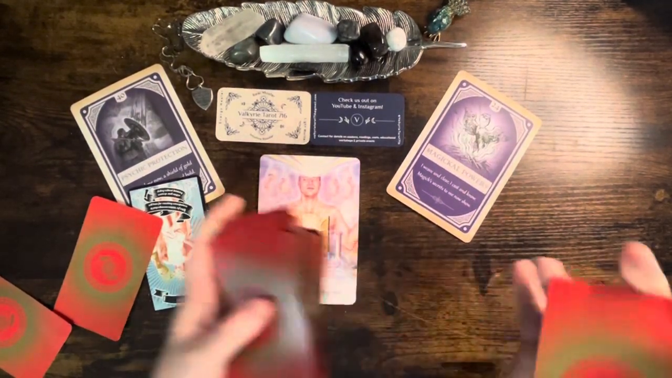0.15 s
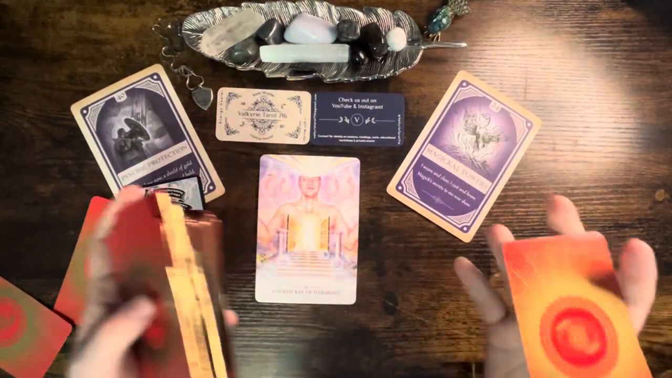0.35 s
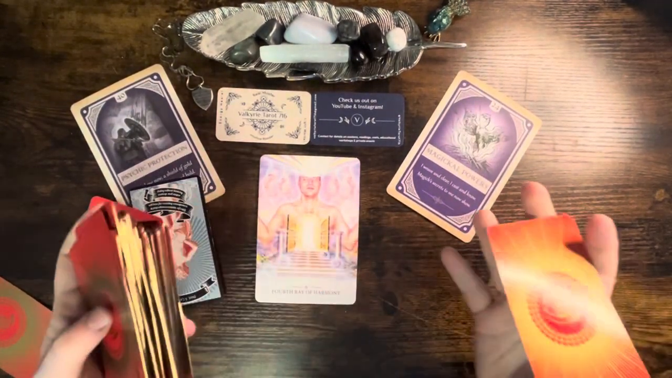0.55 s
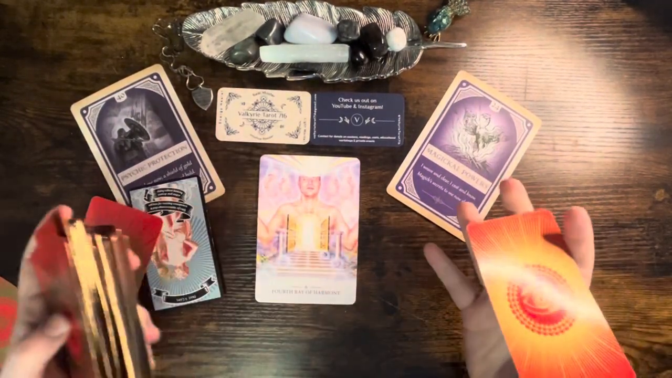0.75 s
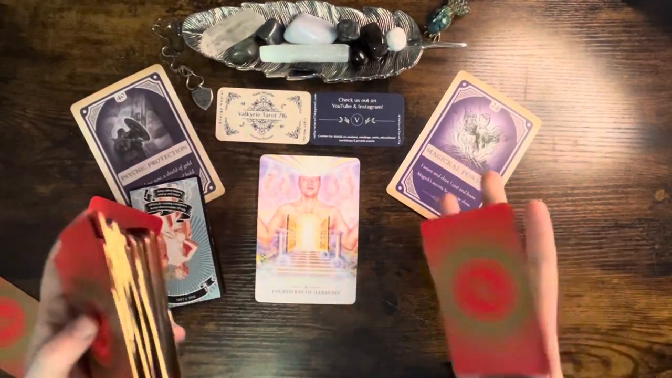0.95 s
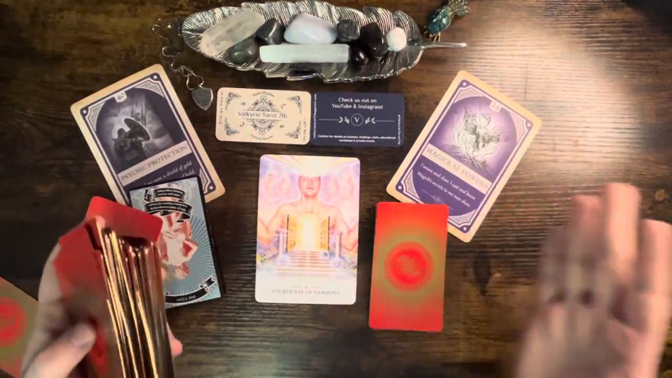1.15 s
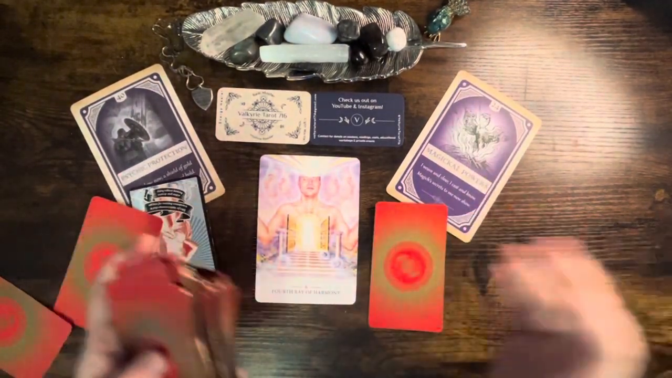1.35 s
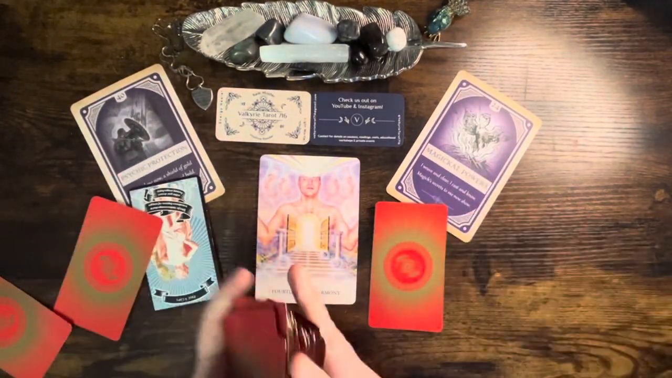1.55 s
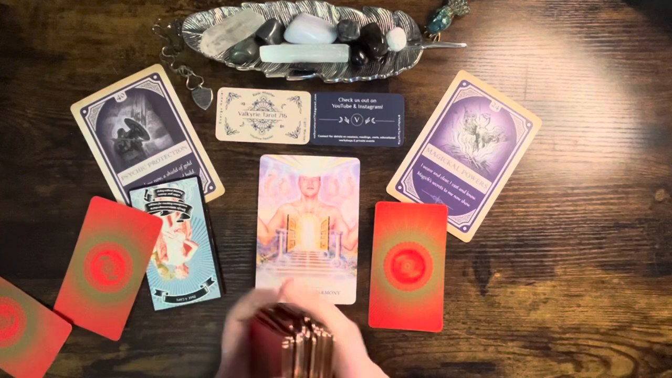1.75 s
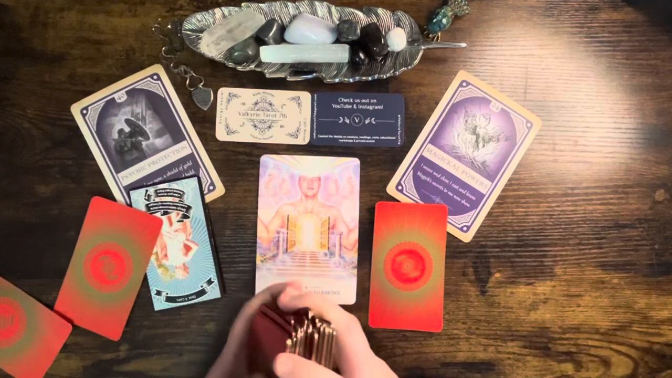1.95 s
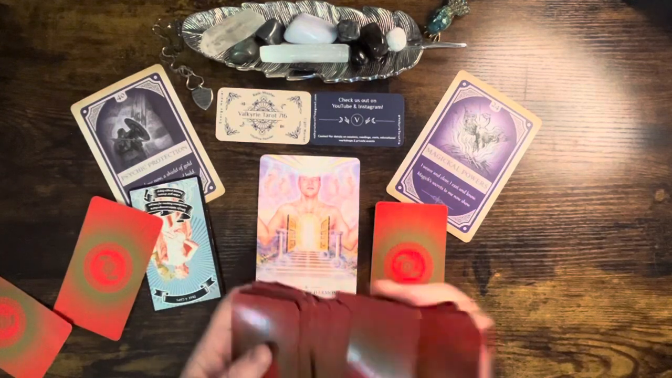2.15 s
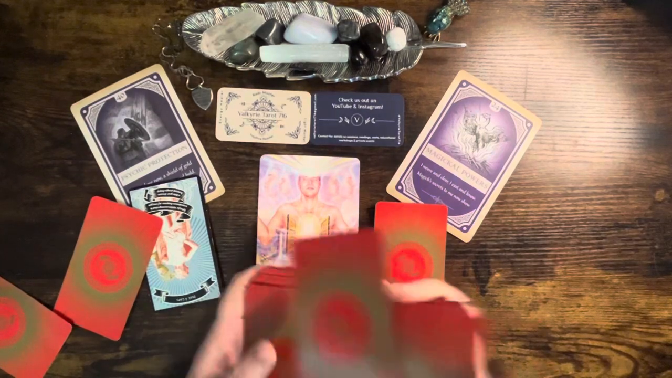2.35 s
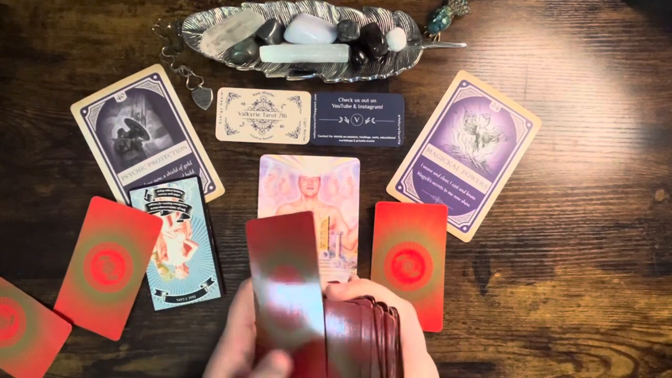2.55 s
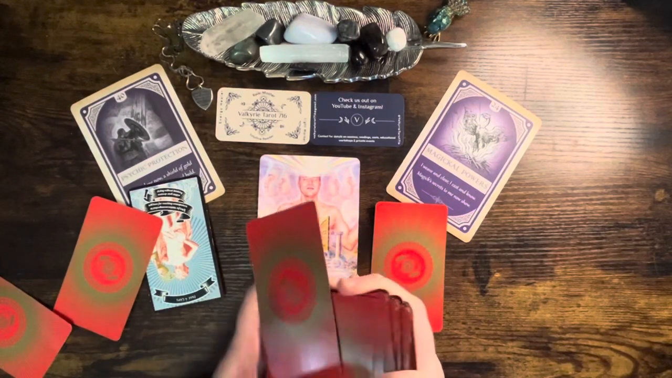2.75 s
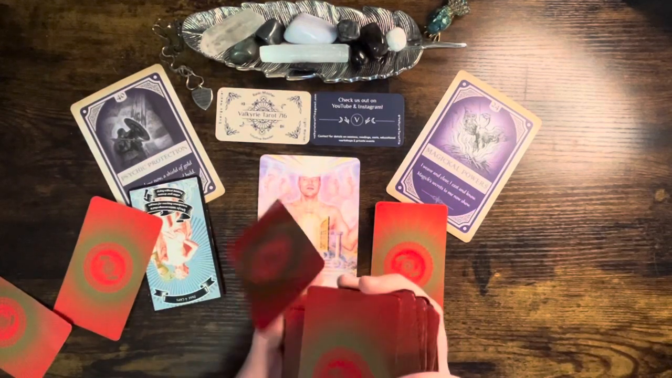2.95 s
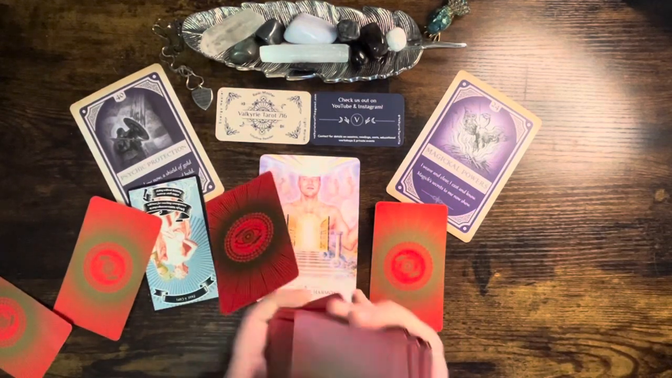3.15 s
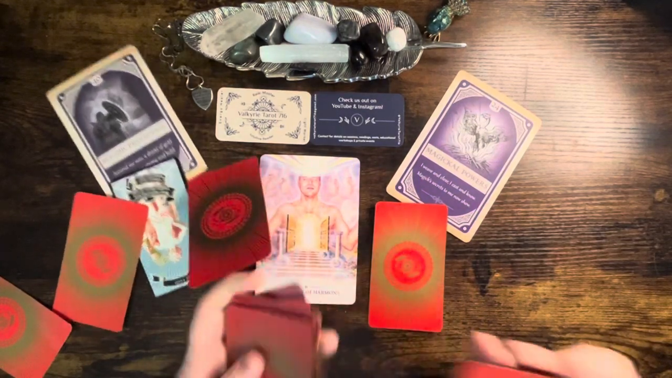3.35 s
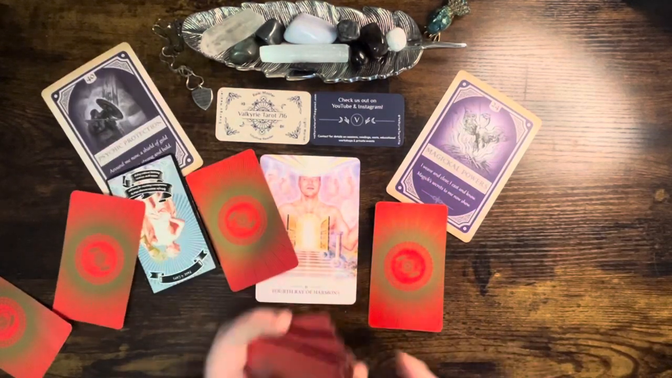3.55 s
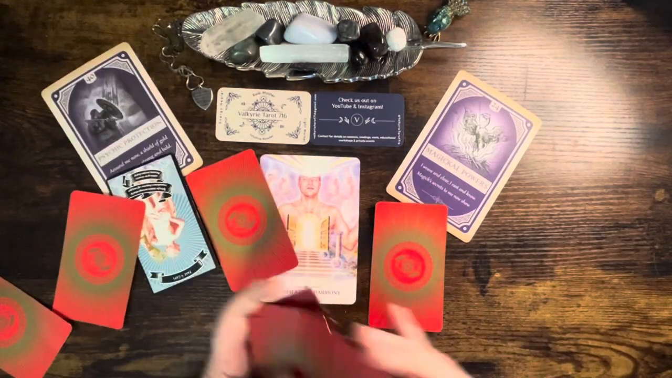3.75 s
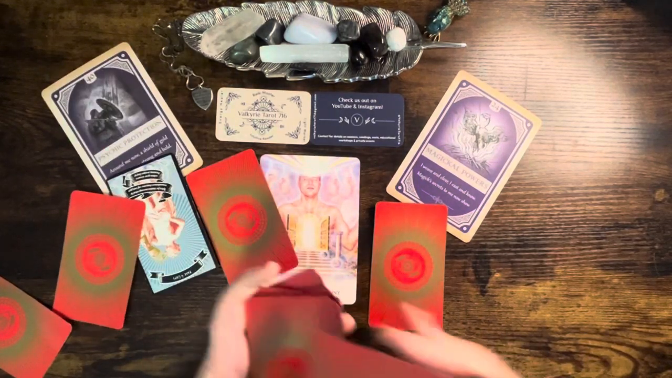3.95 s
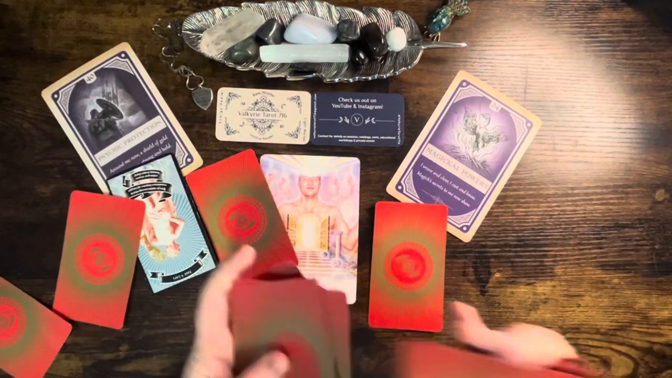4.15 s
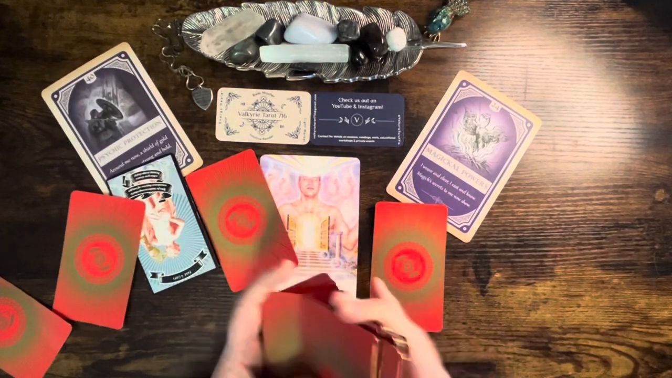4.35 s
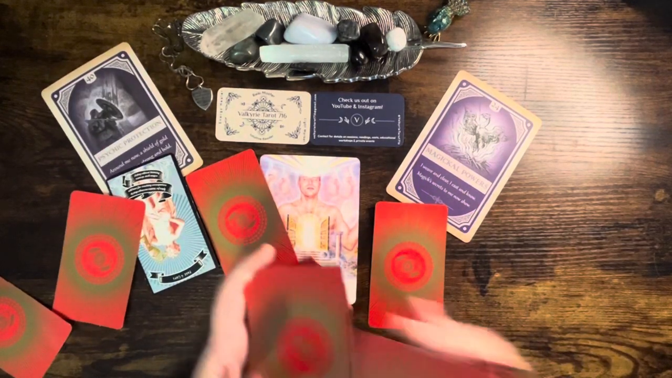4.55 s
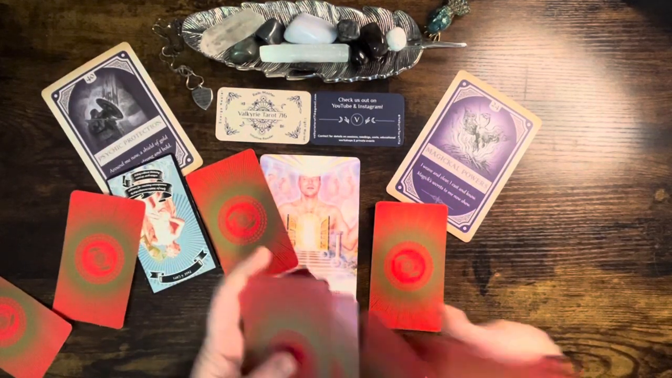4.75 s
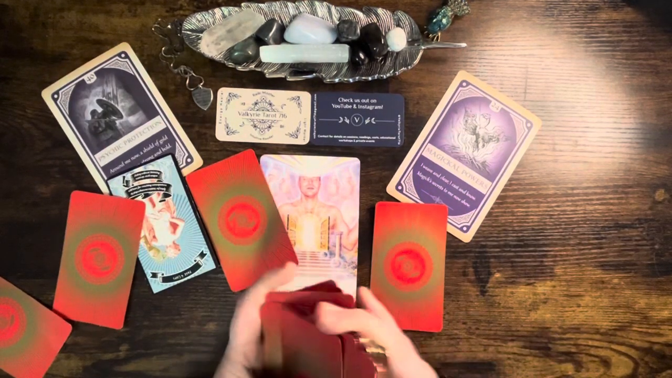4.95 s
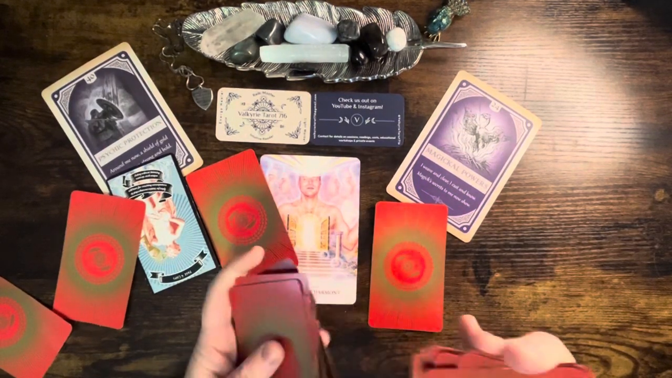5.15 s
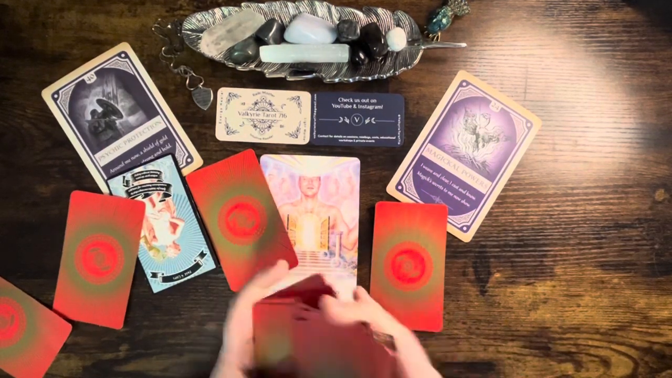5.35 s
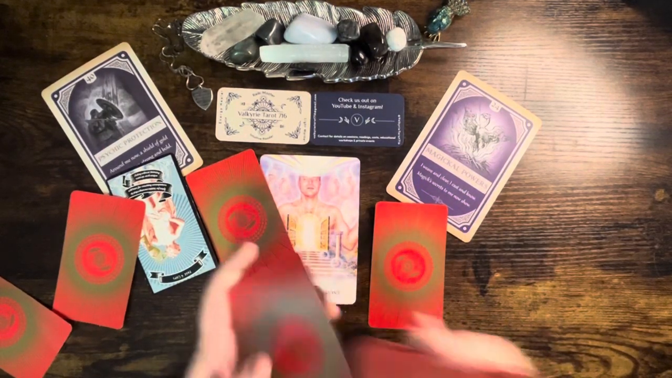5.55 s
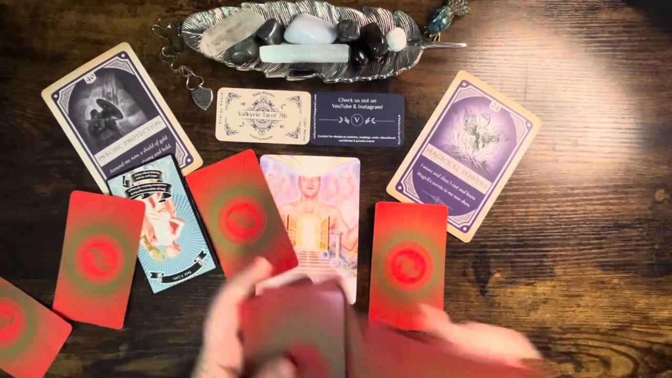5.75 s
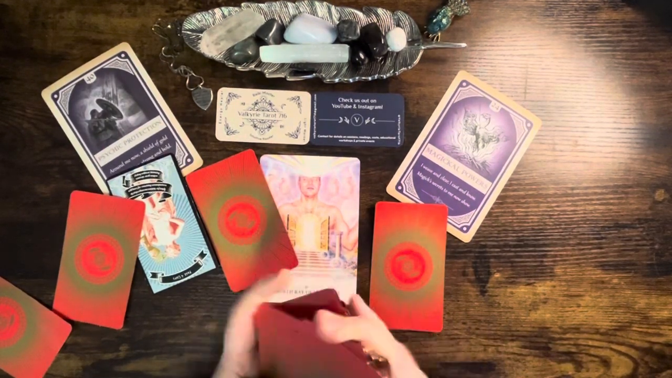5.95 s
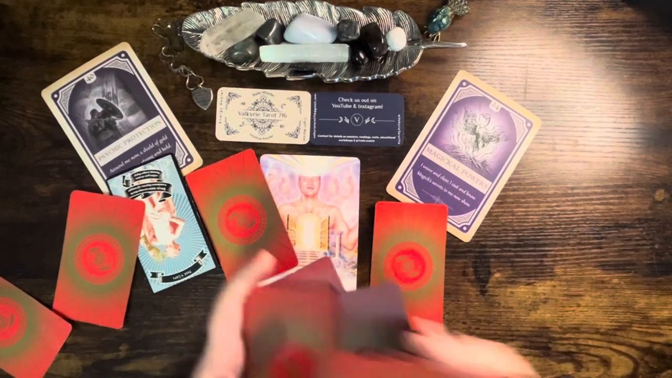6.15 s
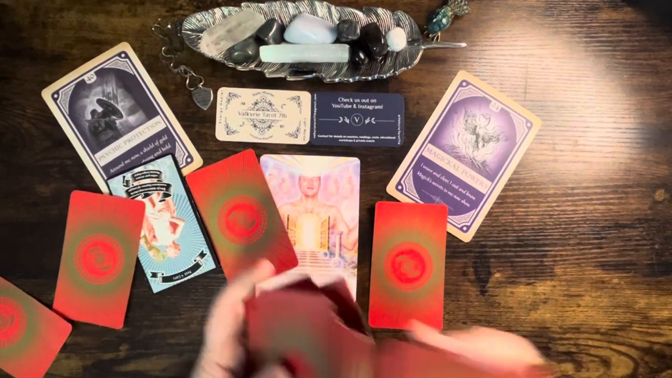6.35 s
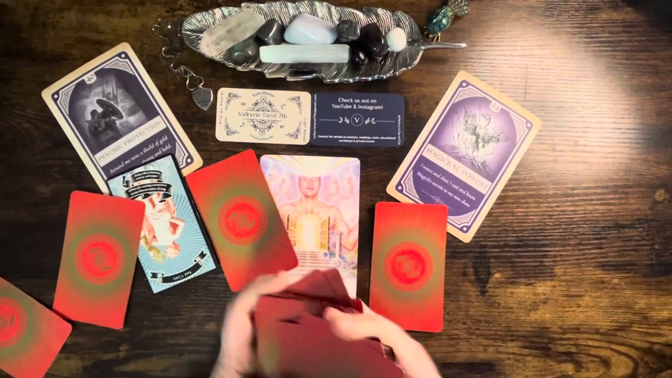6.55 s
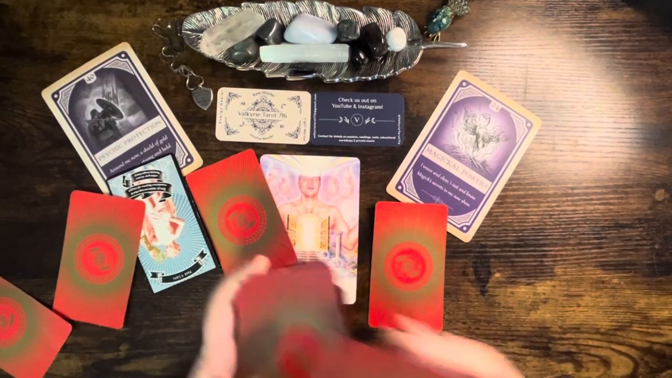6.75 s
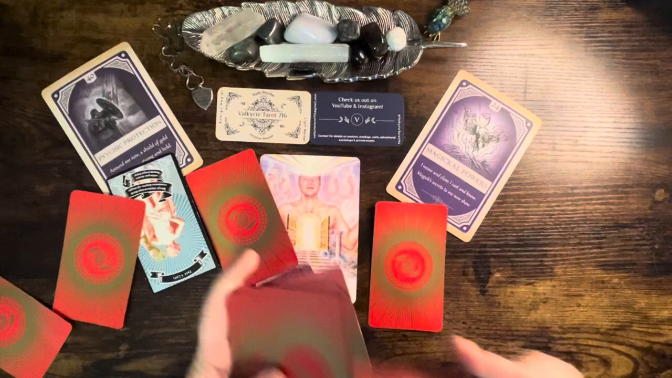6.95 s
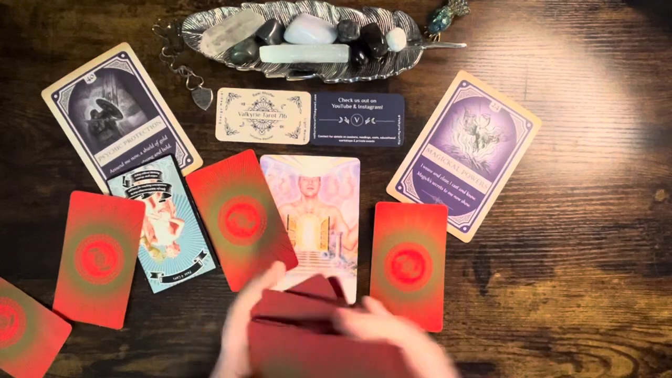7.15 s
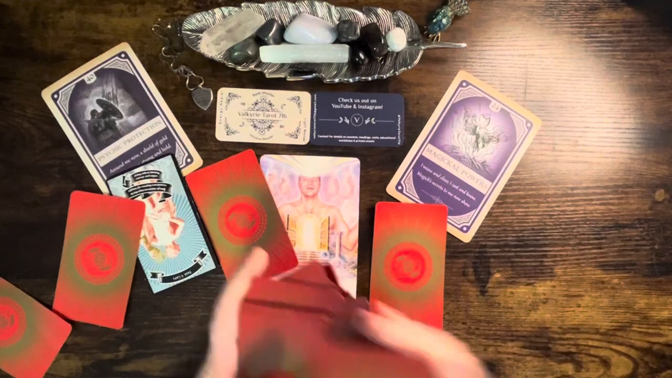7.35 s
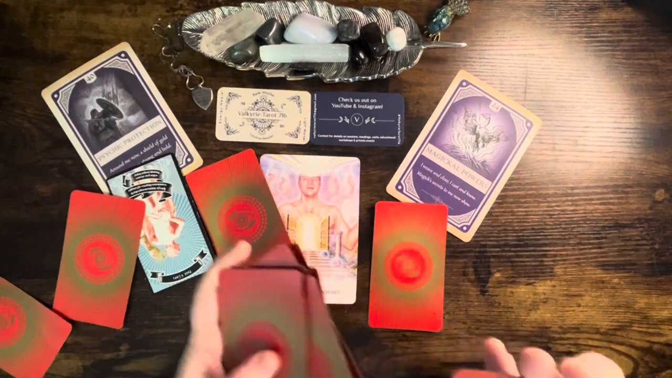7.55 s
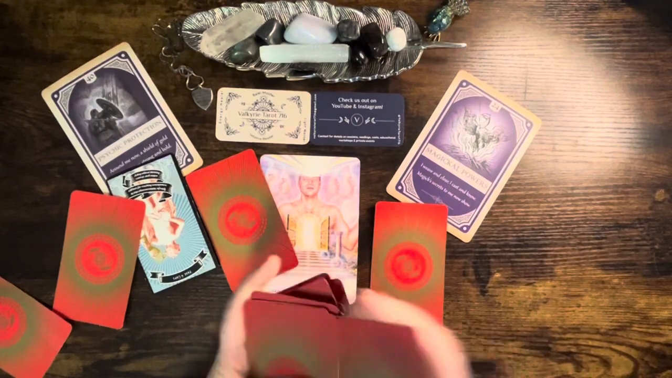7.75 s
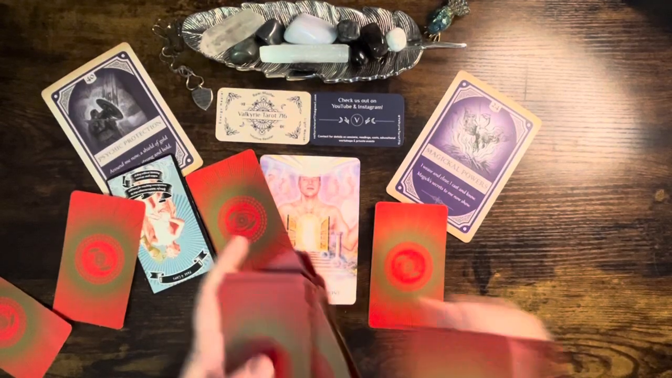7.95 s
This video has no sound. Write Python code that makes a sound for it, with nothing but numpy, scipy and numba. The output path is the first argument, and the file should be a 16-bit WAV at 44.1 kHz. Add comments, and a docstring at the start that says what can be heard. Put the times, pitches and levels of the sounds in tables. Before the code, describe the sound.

Very close stereo microphones catch stiff cards handled above a wooden table. A faint drag leads to one card slapping down with a brief bright skid. The deck is squared and cut with soft swishes and small clacks, another card slips out, then overhand shuffling begins, about three swish-and-clap strokes a second. A small furnished room adds a short tail, low ventilation rumble and faint hiss.

```python
"""A deck of stiff cards is shuffled overhand above a wooden table, close to a phone's two microphone ports.
One card is dropped on the table and another falls out; then packets slide off about three times a second:
the thumb flicks and scrapes an edge (noise bursts), the packet swishes (dense micro-slips) and claps as it
lands (short rings and noise). Softer rubs, squeaks and knocks join in. A quiet furnished room surrounds
the hands, with a low ventilation rumble and faint wide hiss made of filtered noise."""
import sys
import numpy as np
from scipy import signal
from scipy.fft import rfft, irfft, next_fast_len
from scipy.io import wavfile
from scipy.ndimage import uniform_filter1d, map_coordinates
from numba import njit

SR = 44100
rng = np.random.default_rng(int(sys.argv[2]) if len(sys.argv) > 2 else 0)


def file_out(sig):
    """Save sig as 16-bit WAV at sys.argv[1]."""
    # one column per channel
    cols = np.atleast_2d(sig).T
    # limit, then scale
    lim = np.clip(cols, -1, 1)
    pcm = np.round(lim * 32767).astype(np.int16)
    wavfile.write(sys.argv[1], SR, pcm)


N = 353682
LEFT_RIGHT = np.array([[1], [-1]])  # side sound has opposite signs at the two ports


def amp(db):
    """Decibels to gain."""
    return 10 ** (np.asarray(db) / 20)


def unit(x):
    """Scale to rms 1."""
    return x / np.sqrt(np.mean(x ** 2))


def burst(x):
    """Scale to energy 1."""
    return x / np.sqrt(np.sum(x ** 2))


def along(points, hz):
    """Read (Hz, value) points on a log-frequency axis."""
    f, value = np.transpose(points)
    return np.interp(np.log(hz + 1), np.log(f + 1), value)


def colour(x, points, size=2048):
    """Causal filter with the given spectrum, built from its cepstrum."""
    hz = np.arange(size // 2 + 1) * SR / size
    cepstrum = irfft(np.log(amp(along(points, hz))))
    # folding the cepstrum makes the filter minimum-phase
    cepstrum[1:size // 2] *= 2
    cepstrum[size // 2 + 1:] = 0
    response = irfft(np.exp(rfft(cepstrum)))
    return signal.fftconvolve(x, response)[:len(x)]


@njit
def resonate(x, hz, q):
    """State-variable band-pass with a moving centre, gain 1 there."""
    y, band, low = np.empty(len(x)), 0., 0.
    for i in range(len(x)):
        g = np.tan(np.pi * hz[i] / SR)
        v = (band + g * (x[i] - low)) / (1 + g * (g + 1 / q))
        band, low, y[i] = 2 * v - band, low + 2 * g * v, v / q
    return y


def walk(rate):
    """Smooth random sway of rms 1 that changes about rate times a second."""
    k = max(int(SR / rate), 1)
    steps = np.repeat(rng.standard_normal(N // k + 1), k)
    return unit(uniform_filter1d(steps, k)[:N])


def slips(rate, spread_db, count=N):
    """Tiny catches of a rubbing surface, rate a second, of uneven size."""
    happens = rng.random(count) < rate / SR
    return happens * rng.standard_normal(count) * amp(spread_db * rng.standard_normal(count))


def ping(hz, q, size=1024):
    """A short ring that swells and dies within a few cycles; energy 1."""
    t = np.arange(size) / SR
    return burst(t * np.exp(-np.pi * hz * t / q) * np.sin(2 * np.pi * hz * t))


def even_out(response, order=61):
    """Give each channel of an impulse response the same energy in every broad band; its fine ripple stays."""
    spectrum = rfft(response)
    power = uniform_filter1d(np.abs(spectrum) ** 2, order, axis=1)
    hz = np.linspace(0, SR / 2, power.shape[1])
    flattened = []
    for channel, band_power in zip(response, power):
        correction = np.column_stack([hz, -10 * np.log10(band_power)])
        flattened.append(colour(channel, correction))
    return np.array(flattened)


# spectrum of the ventilation rumble at the ports: pitch_hz, level_db_per_hz
RUMBLE_SPECTRUM = [(20, -91.5), (38, -90), (52, -73.5), (76, -73), (102, -74), (128, -69.5), (150, -73.5),
                   (178, -87), (203, -83.5), (250, -103), (380, -101), (800, -125)]
# spectra of the room's faint hiss, shared by the ports and opposed between them: pitch_hz, level_db_per_hz
AIR_SPECTRUM = [(150, -108), (350, -108.5), (600, -101.5), (850, -103.5), (1200, -111), (2000, -114),
                (4200, -116), (8000, -119), (13000, -122), (16000, -130)]
AIR_SIDE_SPECTRUM = [(200, -110), (380, -107), (650, -102), (1000, -106), (2000, -116), (4200, -118),
                     (8000, -127), (13000, -138)]


def background(rumble_side_db=-17, throb_db=0.9):
    """Low ventilation rumble with a slight throb, nearly alike at both ports, under a faint wide hiss."""
    noise = rng.standard_normal((4, N)) * np.sqrt(SR / 2)
    shared = colour(noise[0], RUMBLE_SPECTRUM, size=16384)
    side = amp(rumble_side_db) * colour(noise[1], RUMBLE_SPECTRUM, size=16384)
    rumble = shared + LEFT_RIGHT * side
    air = colour(noise[2], AIR_SPECTRUM) + LEFT_RIGHT * colour(noise[3], AIR_SIDE_SPECTRUM)
    return rumble * amp(throb_db * walk(rate=8.3)) + air


# colour of the furnished room's tail, shared, then further colour of its side part: pitch_hz, level_db
TAIL_SPECTRUM = [(100, 14), (300, 8.5), (600, 7), (1000, 1.5), (1700, -1.5), (4000, -1.5), (8000, -3),
                 (15000, -10)]
TAIL_SIDE_SPECTRUM = [(100, -15), (400, -1), (1500, -3.5), (3500, 0), (6000, -11), (9000, -3), (13000, -34)]
# colour of the side part of the scatter off hands and table top: pitch_hz, level_db
SCATTER_SIDE_SPECTRUM = [(200, -11.5), (800, 4.5), (1600, 3.5), (3000, -5), (4700, -13), (6500, -4.5),
                         (9000, -4.5), (13000, -22)]


def room(x, table_db=-8, table_t60=0.032, tail_db=-12, low_t60=0.22, high_t60=0.27, size=16384):
    """Direct sound, quick scatter from hands and table top, and the short tail of a furnished room."""
    t = np.arange(size) / SR
    scatter_decay = (t > .0006) * amp(-60 * t / table_t60)
    near = [burst(rng.standard_normal(size) * scatter_decay) for _ in range(2)]
    low_pass = signal.butter(2, 1800, fs=SR, output="sos")
    high_pass = signal.butter(2, 1800, "high", fs=SR, output="sos")
    tails = []
    for _ in range(2):
        noise = rng.standard_normal(size) * np.clip(t / 0.004, 0, 1) ** 2
        lows = signal.sosfilt(low_pass, noise) * amp(-60 * t / low_t60)
        highs = signal.sosfilt(high_pass, noise) * amp(-60 * t / high_t60)
        tails.append(colour(burst(lows - highs), TAIL_SPECTRUM))
    mid = (t == 0) + amp(table_db) * near[0] + amp(tail_db) * tails[0]
    scatter_side = amp(table_db) * colour(near[1], SCATTER_SIDE_SPECTRUM)
    side = scatter_side + amp(tail_db) * colour(tails[1], TAIL_SIDE_SPECTRUM)
    response = even_out(mid + LEFT_RIGHT * side)
    return signal.fftconvolve(x[None], response, axes=1)[:, :N]


def table_mirror(x, mirror_db=-7, lag_s=0.000904, sway_db=2.5):
    """The table top returns the rubbing late; the lag sways with the hands, so bands wander through the hiss."""
    lag = lag_s * SR * amp(sway_db * walk(rate=3))
    late = map_coordinates(x, [np.arange(N) - lag], order=3, mode="constant")
    return (x + amp(mirror_db) * late) / np.hypot(1, amp(mirror_db))


def off_hands(x, lag_s=0.00111, sway_db=2.5, glance_db=-2):
    """Each impact also glances off the moving hands, so its path to the ports keeps changing."""
    lag = lag_s * SR * amp(sway_db * walk(rate=4))
    return amp(glance_db) * map_coordinates(x, [np.arange(N) - lag], order=1, mode="constant")


# the palm brushes the cards: start_s, length_s, level_db
PALM_BRUSHES = [(0.406, .14, -51), (1.1, 0.56, -62.5)]
# shape of the palm's dull spectrum: pitch_hz, relative_level_db
PALM_SPECTRUM = [(60, 4), (120, 2.5), (200, -1), (380, -3), (550, -11), (1200, -27), (3000, -53)]


def palm():
    """Skin dragging over a card: a dull rub that swells and fades."""
    t = np.arange(N) / SR
    swell = np.zeros(N)
    for start_s, length_s, level_db in PALM_BRUSHES:
        part = np.clip((t - start_s) / length_s, 0, 1)
        swell += amp(level_db) * np.sin(np.pi * part)
    return swell * unit(colour(slips(rate=3300, spread_db=3.0), PALM_SPECTRUM))


# soft squeaks of card on card or on the table:
# start_s, length_s, start_pitch_hz, end_pitch_hz, level_db, resonance_q (of each of two passes)
CARD_SQUEAKS = [(0.5, 1.24, 510, 530, -60, 3.2), (1.139, 0.078, 486, 554, -49, 6),
                (1.219, 0.22, 530, 570, -63, 4), (1.46, .16, 527, 520, -58, 3.5),
                (3.791, 0.051, 4450, 4330, -41, 6), (3.843, 0.053, 4300, 4220, -56, 6),
                (4.101, 0.025, 1460, 1660, -28.5, 6), (4.386, 0.05, 1550, 2540, -40, 2.7)]


def squeaks(waver_db=0.4):
    """Soft rubbing in one narrow, gliding resonance that swells and fades while its pitch wavers."""
    out, waver = np.zeros(N), amp(waver_db * walk(rate=60))
    noise = rng.standard_normal(N)
    for start_s, length_s, start_hz, end_hz, level_db, q in CARD_SQUEAKS:
        part = np.linspace(0, 1, int(length_s * SR))
        start = int(start_s * SR)
        span = slice(start, start + len(part))
        hz = (start_hz + (end_hz - start_hz) * part) * waver[span]
        once = resonate(noise[span], hz, float(q))
        rub = resonate(once, hz, float(q))
        out[span] += amp(level_db) * np.sin(np.pi * part) * unit(rub)
    return out


# one card drags lightly over the fingers while it is drawn and held out:
# time_s, level_db, pitch_hz (resonance of the gap under it)
DRAG_PATH = [(0, -67, 1660), (0.2, -73.5, 1600), (0.5, -66.5, 1510), (0.75, -73.5, 1500), (1.0, -70, 1450),
             (1.35, -72, 1400), (1.58, -59.5, 1340), (1.75, -79, 1350), (1.9, -100, 1330)]
# levels of the gap's rings at 1, 2, 3... times its resonance: relative_level_db
DRAG_RINGS = [9, 1.5, -1, -8.5, -15.5]


def drag(first_q=5, waver_db=2.0):
    """Light, wavering friction rings the gap under a single card; its resonances sink as the card tilts away."""
    t = np.arange(N) / SR
    time_s, level_db, pitch_hz = np.transpose(DRAG_PATH)
    gap_hz = np.interp(t, time_s, pitch_hz) * amp(0.29 * walk(rate=12))
    rub = slips(rate=7000, spread_db=5.0)
    rings = np.zeros(N)
    for k, ring_db in enumerate(DRAG_RINGS, 1):
        rings += amp(ring_db) * unit(resonate(rub, k * gap_hz, float(first_q * k)))
    return unit(rings) * amp(np.interp(t, time_s, level_db) + waver_db * walk(rate=28))


# shape of the dropped card's hiss on the wood: pitch_hz, relative_level_db
SKID_SPECTRUM = [(300, -15), (600, 6), (1050, -13), (1400, 4), (2300, -15), (3000, -9), (3450, 6),
                 (4100, -3), (4680, 8), (5400, -2), (6300, 5.5), (7000, -11), (7900, 4.5), (9000, -11.5),
                 (12000, -4.5), (15000, -9)]


def skid(start_s=1.18, stop_s=1.386, edge_s=0.052, end_db=-44, growth_db=15, grain_db=1):
    """Fine wood grain passes under the sliding card: an even, bright hiss that swells and is cut short."""
    t = np.arange(N) / SR
    part = np.clip((t - start_s) / (stop_s - start_s), 0, 1)
    # fades of edge_s lie just outside start and stop
    moving = np.clip(np.minimum(t - start_s, stop_s - t) / edge_s + 1, 0, 1)
    grain = slips(rate=17000, spread_db=-1.5) * amp(grain_db * walk(rate=190))
    return unit(colour(grain, SKID_SPECTRUM)) * moving * amp(end_db - growth_db * (1 - part) ** 2)


# shape of the clap of trapped air, also used for corner snaps and knocks: pitch_hz, relative_level_db
CLAP_SPECTRUM = [(200, -29.5), (450, -7.5), (700, 7), (1600, 5), (3300, 4), (5000, 3), (9000, -19)]
# single corners springing free, and the falling card's flutter: start_s, level_db, pitch_hz
CORNER_SNAPS = [(.942, -30, 695), (0.985, -36, 2320), (1.131, -23, 900), (1.579, -28, 800),
                (2.072, -36, 2400), (2.199, -23.5, 2200), (2.651, -47, 2000), (2.9694, -30, 4200),
                (3, -27, 2930), (3.0233, -27.5, 3950), (3.026, -34, 2900), (3.038, -37, 3820),
                (3.089, -28, 4520), (3.718, -30, 2000), (3.7612, -15, 1710), (3.7735, -20, 3300),
                (3.796, -17, 2000), (4.344, -22.5, 2720), (4.388, -24, 1660), (4.678, -21.5, 3400),
                (4.895, -11.5, 1800), (4.991, -19, 2200), (5.3833, -22, 2800), (5.451, -15, 2500),
                (5.567, -33, 1300), (5.704, -10, 3000), (6.2298, -19, 1100), (6.494, -18, 1510),
                (6.564, -20, 1560), (6.582, -23, 3800), (6.629, -14, 2400), (6.876, -27, 3500),
                (6.908, -8.5, 3680), (7.11, -28, 3000), (7.163, -27, 1700), (7.428, -17, 2600),
                (7.446, -30, 2300), (7.719, -30, 2300)]


def corners(corner_q=4, snap_db=-5, snap_s=0.0019, spread_db=9, size=1024):
    """A corner lets go with a tiny dry snap of uneven touches and a short ring."""
    out, t = np.zeros(N + size), np.arange(size) / SR
    for start_s, level_db, pitch_hz in CORNER_SNAPS:
        touches = slips(rate=10000, spread_db=spread_db, count=size) * np.exp(-t / snap_s)
        snap = burst(colour(touches, CLAP_SPECTRUM))
        start = int(start_s * SR)
        out[start:start + size] += amp(level_db) * burst(ping(pitch_hz, corner_q) + amp(snap_db) * snap)
    return out[:N]


# the deck knocked firmly, or a card hitting the table flat:
# start_s, level_db, pitch_factor, soft_hz (above it the contact is too soft to ring the cards fully)
DECK_KNOCKS = [(1.0815, -7, 1.06, 6000), (5.0325, 9, 1.014, 3010), (6.504, -8.5, 1.05, 2820),
               (7.362, 2.5, 0.98, 6020)]
# what the stiff cards ring with: pitch_hz (before pitch_factor), relative_level_db, t60_s
STIFF_CARD_MODES = [(870, 2.5, 0.018), (1376, -5, 0.0077), (1740, -4.5, 0.0079), (2310, 2, 0.0092),
                    (2800, -8, .007), (3400, -0.5, 0.009), (4490, 0, 0.0063)]


def knocks(rise_s=0.0011, crack_db=-3, crack_s=0.0047, size=4096):
    """One firm contact clatters through the stack and rings its damped modes; softer ones weaken the high modes."""
    out, t = np.zeros(N + size), np.arange(size) / SR
    rise = 1 - np.exp(-t / rise_s)
    for start_s, level_db, pitch, soft_hz in DECK_KNOCKS:
        ring = np.zeros(size)
        for hz, mode_db, t60_s in STIFF_CARD_MODES:
            mode = burst(np.sin(2 * np.pi * hz * pitch * t) * amp(-60 * t / t60_s))
            ring += mode * amp(mode_db) / np.hypot(1, (hz / soft_hz) ** 2)
        touches = slips(rate=9000, spread_db=1.0, count=size) * np.exp(-t / crack_s)
        crack = colour(touches, CLAP_SPECTRUM)
        knock = burst(burst(ring * rise) + amp(crack_db) * burst(crack * rise))
        start = int(start_s * SR)
        out[start:start + size] += amp(level_db) * knock
    return out[:N]


# the thumb catches the next packet, whose edge flicks and scrapes:
# start_s, flick_level_db, scrape_level_db (before the hiss mix), scrape_length_s
THUMB_GRIPS = [(3.669, -33.5, -51.5, 0.11), (4.025, -45, -40, 0.039), (4.319, -23, -42, 0.041),
               (4.632, -34, -46, 0.014), (5.289, -18.5, -44, 0.037), (5.56, -33, -62, 0.033),
               (5.614, -18, -41.5, 0.026), (5.896, -34, -41, 0.037), (6.162, -9.5, -43, 0.0075),
               (6.49, -38, -39.5, 0.026), (6.786, -13, -42, 0.059), (7.07, -16, -39.5, 0.053),
               (7.68, -23, -43.5, 0.049), (8.005, -13.5, -46.5, 0.013)]
# shape of touching card edges: pitch_hz, relative_level_db
TICK_SPECTRUM = [(1500, -11.5), (3500, -24), (5000, 13.5), (8500, 7.5), (12500, 6), (16000, 4.5)]


def flicks(peak_s=0.0041, size=2048):
    """A released edge buzzes up and dies away within some ms."""
    out, t = np.zeros(N + size), np.arange(size) / SR
    for start_s, level_db, _, _ in THUMB_GRIPS:
        buzz = slips(rate=13000, spread_db=12.0, count=size) * t * np.exp(-t / peak_s)
        start = int(start_s * SR)
        out[start:start + size] += amp(level_db) * burst(colour(buzz, TICK_SPECTRUM))
    return out[:N]


# fingers and deck keep rubbing faintly: time_s, level_db (before the rustle mix)
HOLDING_LEVEL = [(0, -72), (.85, -67.5), (1.4, -69), (2.0, -77.5), (2.7, -83), (3.3, -74.5), (3.62, -87.5),
                 (4.0, -80.5), (4.2, -66), (5.3, -64), (6.5, -64), (7.3, -78), (8.0, -100.5)]
# a card or packet speeds up, glides, and is braked by the hand or the table. First one card is drawn, tipped
# off the hand and skids over the table; then the deck is squared and cut, and a card slips out;
# then comes the overhand shuffle, a swish for each packet. Levels are before the hiss and rustle mix:
# full_speed_s, rise_s, glide_s, fall_s, hiss_level_db, rustle_level_db, gap_pitch_hz
CARD_SLIDES = [ (0.0, .01, 0.0046, 0.13, -53.5, -55.5, 1650), (0.142, 0.025, 0.014, 0.052, -71, -58, 1580),
               (0.432, 0.065, 0.043, 0.23, -60.5, -59, 2800), (0.93, 0.11, 0.15, 0.097, -61, -59, 1350),
               (1.02, 0.016, 0.0066, 0.0087, -44, -63, 1644), (1.085, 0.015, .01, 0.21, -51, -44.5, 1130),
               (1.201, 0.23, 0.15, .08, -65, -59, 1100), (1.45, 0.043, 0.25, .1, -56.5, -59, 2300),
               (1.659, 0.13, 0.026, 0.035, -45.5, -56.5, 2270), (1.84, 0.19, 0.014, 0.065, -55, -63, 2600),
               (2.15, 0.35, 0.018, 0.061, -49, -56.5, 3200),
               (2.176, 0.018, 0.0046, 0.015, -27.5, -43.5, 3300),
               (2.305, 0.078, .005, 0.14, -45.5, -48.5, 2300),
               (2.435, 0.032, 0.0026, 0.056, -44.5, -55, 1500),
               (2.65, 0.021, 0.015, 0.077, -70, -68.5, 2190), (2.765, 0.034, 0.03, 0.06, -65, -69, 2400),
               (2.842, 0.025, 0.069, 0.034, -51, -59.5, 3770), (2.959, 0.006, 0.0028, 0.021, -49, -42, 897),
               (2.99, 0.087, 0.047, 0.059, -54.5, -60, 3500), (3.085, .01, .005, 0.13, -50, -51, 1593),
               (3.271, 0.091, 0.14, 0.086, -56, -56.5, 2390),
               (3.497, 0.0095, 0.0057, 0.041, -47.5, -52, 2390),
               (3.774, 0.063, 0.02, 0.033, -31, -43, 3194), (3.815, 0.02, 0.0099, 0.012, -36.5, -50, 4170),
               (4.075, 0.02, 0.021, 0.02, -37.5, -47, 2970), (4.117, 0.051, 0.021, 0.015, -28.5, -40, 1885),
               (4.392, 0.034, 0.036, 0.057, -37.5, -48.5, 1816),
               (4.433, 0.031, 0.012, 0.018, -25, -43, 3300), (4.52, 0.05, 0.034, 0.018, -49.5, -64, 3300),
               (4.689, 0.062, 0.1, 0.042, -37.5, -45.5, 3160),
               (4.905, 0.083, 0.015, 0.027, -30.5, -34, 1980),
               (4.986, 0.06, 0.063, 0.035, -37.5, -41, 2900), (5.21, 0.084, .01, 0.13, -75, -60, 900),
               (5.379, 0.019, 0.02, 0.065, -23.5, -34.5, 4600),
               (5.701, 0.051, 0.019, 0.052, -26, -37.5, 2900),
               (5.962, 0.023, 0.015, 0.02, -37.5, -52, 3900),
               (5.989, 0.024, 0.019, 0.077, -24.5, -36.5, 3860),
               (6.201, 0.028, 0.024, 0.033, -36.5, -40.5, 2030),
               (6.29, 0.12, 0.044, 0.063, -40, -46.5, 3100), (6.445, 0.11, 0.018, 0.078, -47.5, -60, 2380),
               (6.58, 0.037, 0.047, 0.033, -34.5, -50, 3195),
               (6.624, 0.024, 0.0059, 0.062, -30.5, -38, 3600),
               (6.868, 0.031, 0.036, 0.082, -33, -41, 4010), (7.2, 0.049, 0.0085, 0.018, -33.5, -45, 2300),
               (7.358, 0.018, .003, 0.0095, -40, -45, 2405), (7.426, 0.079, 0.023, 0.013, -40, -37, 2450),
               (7.751, 0.045, 0.0058, 0.016, -36.5, -39.5, 3580)]


def rubbing(holding_hz=1500, scrape_rise_s=.003, scrape_fall_s=0.011, scrape_rustle_db=-6, scrape_hz=2850):
    """Edge hiss gain, sheet rustle gain and gap resonance of all slides, thumb scrapes and the holding hand."""
    t = np.arange(N) / SR
    scrapes = []
    for start_s, _, db, length_s in THUMB_GRIPS:
        scrapes.append((start_s, scrape_rise_s, length_s, scrape_fall_s, db, db + scrape_rustle_db, scrape_hz))
    holding_db = np.interp(t, *np.transpose(HOLDING_LEVEL)) + 2.5 * walk(rate=16)
    body = amp(holding_db) ** 2
    edge, gap = np.zeros(N), body * holding_hz
    for s, rise, glide, fall, hiss_db, rustle_db, hz in CARD_SLIDES + scrapes:
        span = slice(max(int((s - 2 * rise) * SR), 0), int((s + glide + 2 * fall) * SR))
        slowness = np.maximum((s - t[span]) / rise, (t[span] - s - glide) / fall).clip(0)
        power = amp(-20 * slowness) ** 2  # 20 dB per rise or fall time
        edge[span] += power * amp(hiss_db) ** 2
        body[span] += power * amp(rustle_db) ** 2
        gap[span] += power * amp(rustle_db) ** 2 * hz
    # louder cards weigh more in the resonance
    return np.sqrt(edge), np.sqrt(body), gap / body


def bending(hiss, bend_hz=6100, bend_range_db=1.5, bend_q=8, bend_db=4):
    """The cards flex as they pass, so one resonance wanders through their hiss."""
    hz = np.clip(bend_hz * amp(bend_range_db * walk(rate=14)), 2000, 13000)
    return unit(hiss + amp(bend_db) * resonate(hiss, hz, float(bend_q)))


def catches(rate=120, decay_s=0.0014, jump_db=4):
    """Friction jumps each time an edge catches and dies away at once; 1 between catches."""
    jumps = np.abs(np.tanh(slips(rate=rate, spread_db=0)))
    return 1 + amp(jump_db) * signal.lfilter([1], [1, -np.exp(-1 / (decay_s * SR))], jumps)


# shapes of the hiss of card edges and the rustle of the sheets: pitch_hz, relative_level_db
EDGE_SPECTRUM = [(1500, -36.5), (3000, 2.5), (4500, 1), (6000, -1), (8000, 0), (10500, 0.5), (12500, 0.5),
                 (15500, -2.5)]
SHEET_SPECTRUM = [(100, -44), (230, 3.5), (420, 1.5), (800, 7), (1100, -4), (1700, -3), (3300, -6.5),
                  (4800, 3), (8000, -32.5)]


def sliding(edge, body, gap_hz, hiss_db=-3.5, rustle_db=-3, sheet_db=2.0, judder_db=0.8, flutter_db=1.7,
            snag_db=-9, bright_hz=9000, brighten=0.4, easy_stroke_db=-42, gap_q=2.4):
    """Dense micro-slips hiss at the edges and rustle in the sheets and the gap between them."""
    # the grip catches and lets go as one edge after another passes
    grip = amp(judder_db * walk(rate=430) + flutter_db * walk(rate=90)) * catches()
    # now and then a single corner snags and ticks
    snags = amp(snag_db) * unit(np.tanh(slips(rate=170, spread_db=-11.5)))
    edge_slips = unit(grip * slips(rate=16000, spread_db=-1.0)) + snags
    hiss = bending(colour(edge_slips, EDGE_SPECTRUM))
    # a brisk stroke is brighter than a slow one
    low_pass = signal.butter(2, min(bright_hz, SR / 3), fs=SR, output="sos")
    dull = signal.sosfiltfilt(low_pass, hiss)
    hiss = dull + (hiss - dull) * (edge / amp(easy_stroke_db)) ** brighten
    sheet_slips = unit(grip * slips(rate=6500, spread_db=0.5)) + snags
    sheet = unit(colour(sheet_slips, SHEET_SPECTRUM))
    wandering_hz = np.clip(gap_hz * amp(.5 * walk(rate=27)), 300, 8000)
    gap = unit(resonate(sheet, wandering_hz, gap_q))
    rustle = unit(gap + amp(sheet_db) * sheet)
    return hiss * edge * amp(hiss_db) + rustle * body * amp(rustle_db)


# shape of the dry snap of one passing edge: pitch_hz, relative_level_db
SNAP_SPECTRUM = [(500, -22), (1200, 1), (3000, -0.5), (5500, 4), (8000, -6), (15000, -10)]


def edge_ticks(body, tick_hz=2900, tick_q=2.5, brisk_db=-52, snap_db=3.0, ticks_per_s=260, spread_db=4,
               level_db=-2, size=1024):
    """Single edges spring past each other in a brisk stroke, each with a dry snap and a short ring."""
    rings, snaps, count = np.zeros(N + size), np.zeros(N), int(ticks_per_s * N / SR)
    starts = rng.integers(0, N, count)
    chances = rng.standard_normal((count, 2)).clip(-1.7, 1.7)
    for start, (pitch, strength) in zip(starts, chances):
        hz = np.clip(tick_hz * amp(3.5 * pitch), 1400, 9000)
        rings[start:start + size] += amp(spread_db * strength) * ping(hz, tick_q)
        snaps[start] += amp(spread_db * strength)
    ticks = unit(unit(rings[:N]) + amp(snap_db) * unit(colour(snaps, SNAP_SPECTRUM)))
    return ticks * body * np.tanh(body / amp(brisk_db)) * amp(level_db)


# cards and packets meeting the deck, the hand or the table (levels before the mix in claps()):
# start_s, clap_level_db, clap_pitch_hz, ringing_share (0-1), thud_level_db, tick_level_db
PACKET_CLAPS = [(0.8879, -28.5, 600, 0.5, -26.5, -46), (1.07, -10, 1070, 0.8, -27, -8),
                (1.0813, -4.5, 1170, 0.7, -11, 0), (1.0879, -9, 1100, 0.94, -25, -32),
                (1.162, -23, 530, 0.2, -24, -17.5), (1.68, -23.5, 2170, 0.6, -49, -16.5),
                (2.3036, -10.5, 1800, 0.3, -18.5, -8.5), (2.388, -21.5, 670, 0.77, -22, -36),
                (2.432, -15, 615, 0.4, -28, -7.5), (2.4403, -16, 800, 0.86, -22, -33),
                (2.5067, -28.5, 870, 0.2, -54, -37), (2.9492, -14, 904, 0.48, -25, -15),
                (3.0717, -17.5, 880, 0.7, -21.5, -19), (3.0798, -14.5, 2320, 0.35, -34, -16),
                (3.116, -23, 2500, 0.6, -32, -26), (3.4921, -21, 2310, 0.7, -30.5, -8.5),
                (3.7502, -17, 2160, 0.4, -34, -22), (3.8028, -3, 4350, 0.68, -20.5, -19),
                (3.8277, -15.5, 3260, 0.2, -20.5, -14), (4.109, -1.5, 1424, 1, -46, -30),
                (4.14, -7, 3040, 0.3, -15.5, -25), (4.151, -19, 1220, 0.4, -29, -26.5),
                (4.46, -15.5, 734, 0.13, -18, -39), (4.635, -15, 1440, 0.14, -22.5, -15),
                (4.7183, -14.5, 1270, 0.26, -43, -14.5), (4.7846, -7, 1270, 0.09, -18.5, -38.5),
                (4.9065, -1.5, 3520, 0.75, -3.5, -9), (4.9196, 6.5, 1880, 0.74, -4, -5.5),
                (4.9454, 0, 2060, 0, -14.5, -5), (5.032, 2.5, 1600, 0.37, -22, 3.5),
                (5.3891, -7.5, 880, 0.7, -12.5, -15.5), (5.398, -21, 5000, 0.7, -30, 4.5),
                (5.4597, -8, 778, 0.91, -13.5, -33), (5.6109, -9.5, 1060, 0.12, -14, -7),
                (5.693, -9, 1400, 0.3, -18, -3), (5.731, -11, 684, 0.6, -21.5, -25),
                (5.748, -17, 800, 0, -18.5, -22), (5.9062, -7.5, 3370, 0.32, -16, -10.5),
                (6.0212, -1.5, 1640, 0.28, -11, -8), (6.202, -10.5, 2420, 0.35, -22, -19),
                (6.2896, -12.5, 3260, 0.66, -44, -10), (6.3593, -14.5, 2900, 0.04, -21.5, -19.5),
                (6.5037, 0, 1480, 0.06, -16, -17), (6.6444, -6.5, 2120, 0.01, -10.5, -1.5),
                (6.657, -13.5, 690, 0.5, -15, -4), (6.786, -14.5, 3150, 0.3, -43, -18),
                (6.8928, -3.5, 4400, 0.67, -16.5, -3), (6.9229, -7, 3220, 0.04, -19.5, -19),
                (6.935, -16, 2500, 0.1, -24, -12), (7.1343, -18.5, 1510, 0.4, -38, -11),
                (7.153, -15.5, 1340, 0.27, -22, -9), (7.206, -8.5, 1360, 0.2, -14, -25),
                (7.362, 2, 2700, 0.35, -34, 0), (7.3913, -10, 3060, 0.85, -21, -1),
                (7.7604, -19, 918, 0.6, -24.5, -29.5)]
# shape of the held deck's thud: pitch_hz, relative_level_db
THUD_SPECTRUM = [(60, -5.5), (150, -6.5), (230, -0.5), (340, -5.5), (480, -2.5), (620, -2.5), (1000, -38),
                 (2500, -60)]


def claps(clap_db=1.1, thud_db=0.9, tick_db=-3.0, thud_slower=2.0, ring_faster=1.0, tick_slower=1.4,
          rattle_db=-4, clap_q=4.5, contact_s=0.0018, contact_law=0.041, size=8192):
    """The cards of a packet land within a few ms: edges tick, trapped air claps, the held deck thuds."""
    out, t = np.zeros(N + size), np.arange(size) / SR

    def contacts(length_s):
        """Many small touches that die away over the contact time."""
        return slips(rate=5000, spread_db=6, count=size) * np.exp(-t / max(length_s, 1e-4))

    for start_s, db, hz, share, low_db, high_db in PACKET_CLAPS:
        share = np.clip(share, 0, 1)
        length_s = contact_s / amp(db) ** contact_law  # stronger claps are shorter
        # the edges touch at once; the clap and the thud swell as the gap closes
        tick = burst(colour(contacts(length_s * tick_slower), TICK_SPECTRUM)) * amp(high_db + tick_db)
        broad = burst(colour(t * contacts(length_s), CLAP_SPECTRUM))
        rattle = burst(resonate(t * contacts(length_s * ring_faster), np.full(size, float(hz)), clap_q))
        ring = burst(ping(hz, clap_q, size=size) + amp(rattle_db) * rattle)
        clap = burst(np.sqrt(share) * ring + np.sqrt(1 - share) * broad) * amp(db + clap_db)
        thud = burst(colour(t * contacts(length_s * thud_slower), THUD_SPECTRUM)) * amp(low_db + thud_db)
        start = int(start_s * SR)
        out[start:start + size] += clap + thud + tick
    return out[:N]


# the cards rub along their whole width, so part of the sound differs between the ports: pitch_hz, side_level_db
WIDTH_SPECTRUM = [(500, -11.5), (1200, -17), (2500, -5.5), (4500, -7.5), (8000, -14), (13000, -23)]


def scene():
    """The cards close to the ports in the room, over its background."""
    edge, body, gap_hz = rubbing()
    above_table = sliding(edge, body, gap_hz) + edge_ticks(body) + skid()
    rubs = table_mirror(above_table) + drag()
    impacts = claps() + knocks() + corners() + flicks()
    side = colour(sliding(edge, body, gap_hz) + off_hands(impacts), WIDTH_SPECTRUM)
    # the skidding card lies off to one side, so part of its hiss differs between the ports
    width = LEFT_RIGHT * (side + amp(-9) * skid())
    return room(rubs + impacts + squeaks() + palm()) + width + background()


# how far the left microphone port leads the right: pitch_hz, lead_radians
PORT_LEAD = [(1700, 0), (2700, 1.3), (4500, 1.7), (5900, 3.2), (6600, 3.7), (7600, 6.1), (8800, 6.7),
             (9700, 9.3), (10800, 9.6), (11850, 12.45), (13200, 12.75), (14050, 15.5), (15900, 16.2)]
# left port minus right port: pitch_hz, level_db
PORT_LEVELS = [(60, -1), (110, -0.5), (200, -3.5), (380, -2.5), (700, -1.5), (1290, 5.5), (2380, 0),
               (4400, -2), (8120, 0), (15000, -1)]


def record(dry):
    """The left port hears the treble a little earlier, each port has its own colour, and the top is cut."""
    size = next_fast_len(N + 4096)
    hz = np.arange(size // 2 + 1) * SR / size
    balance = amp(LEFT_RIGHT * along(PORT_LEVELS, hz) / 2)
    lead = np.exp(1j * LEFT_RIGHT * along(PORT_LEAD, hz) / 2)
    heard = irfft(rfft(dry, size) * balance * lead, size)[:, :N]
    top_cut = signal.ellip(10, .2, 80, 15900, fs=SR, output="sos")
    return signal.sosfilt(top_cut, heard)


dry = scene()
out = record(dry)
file_out(out)
```